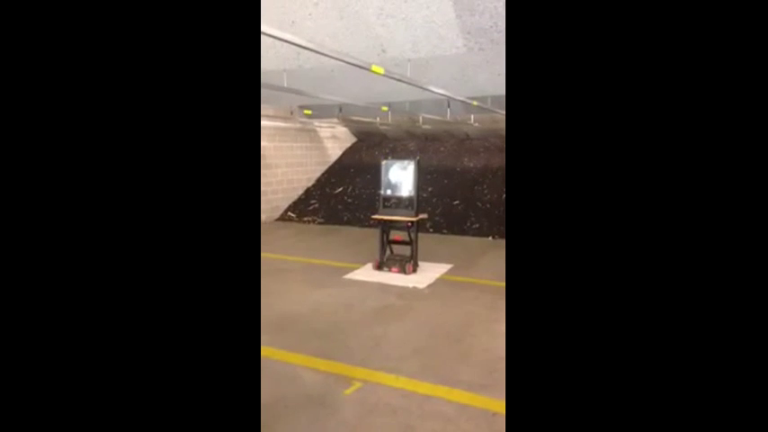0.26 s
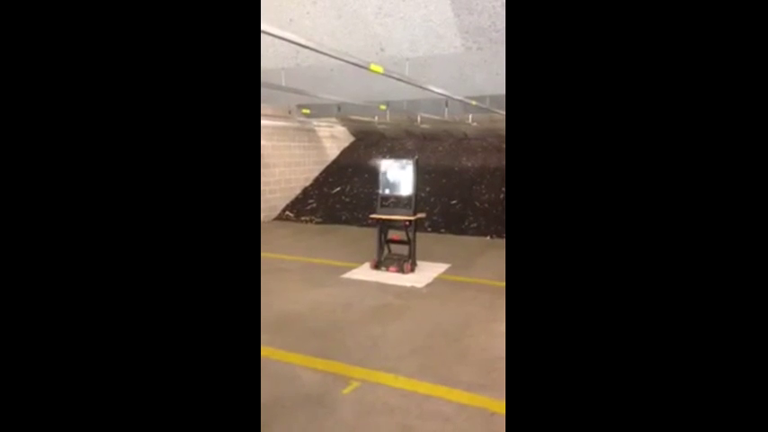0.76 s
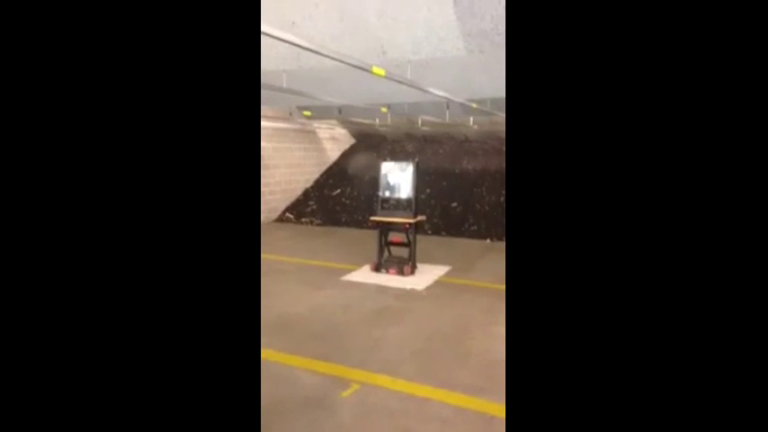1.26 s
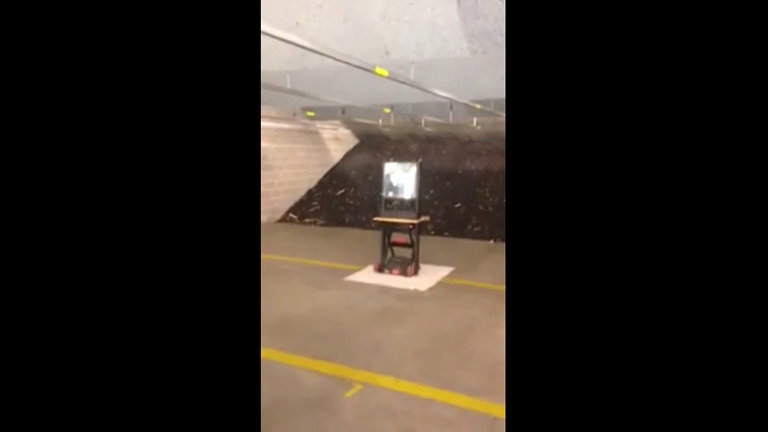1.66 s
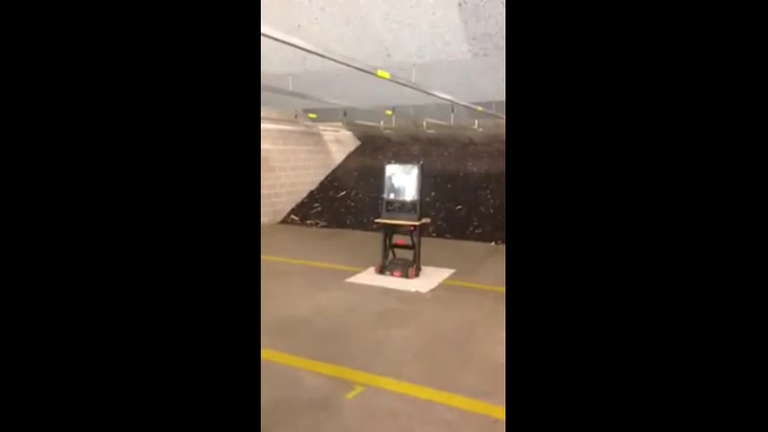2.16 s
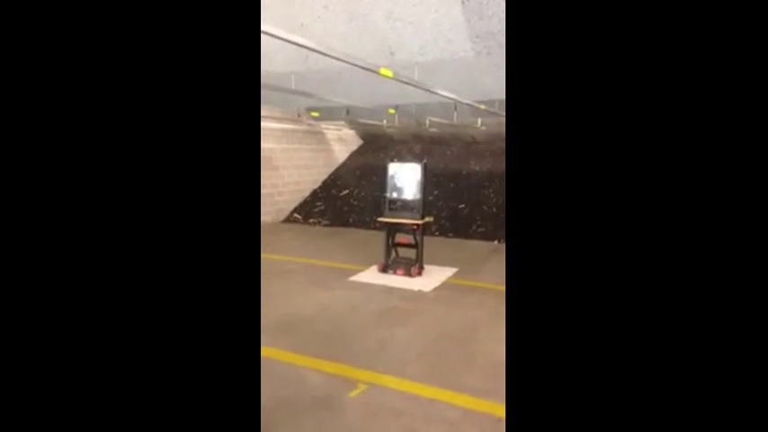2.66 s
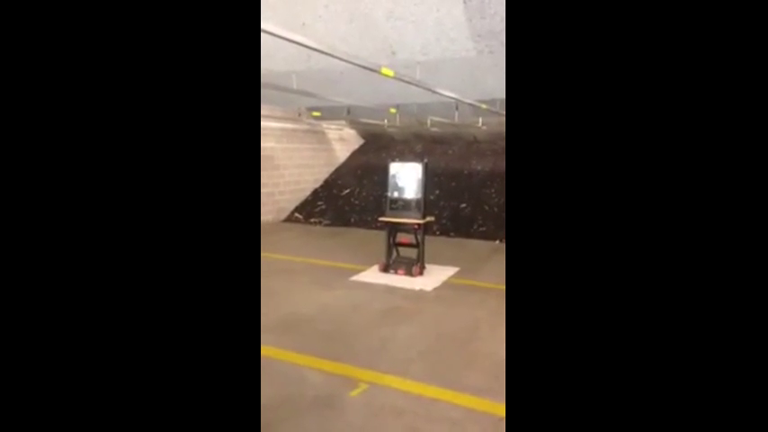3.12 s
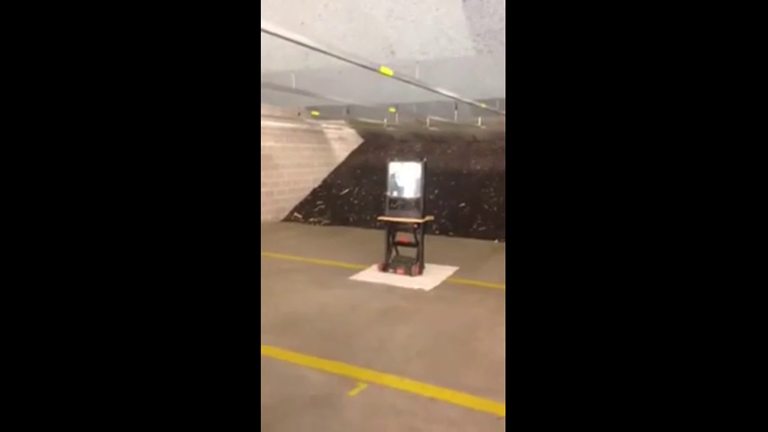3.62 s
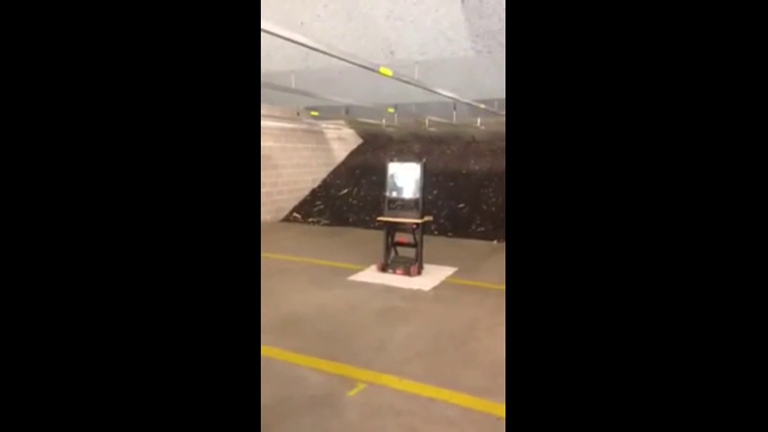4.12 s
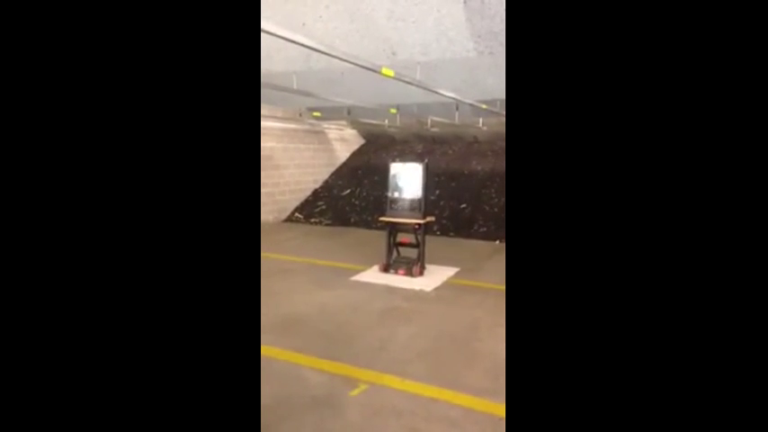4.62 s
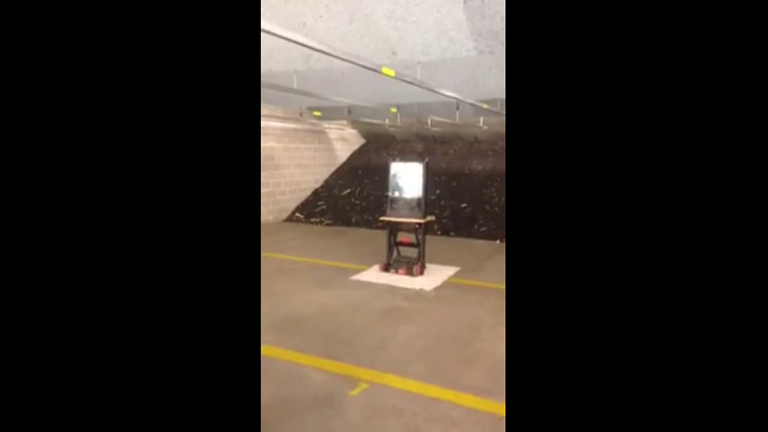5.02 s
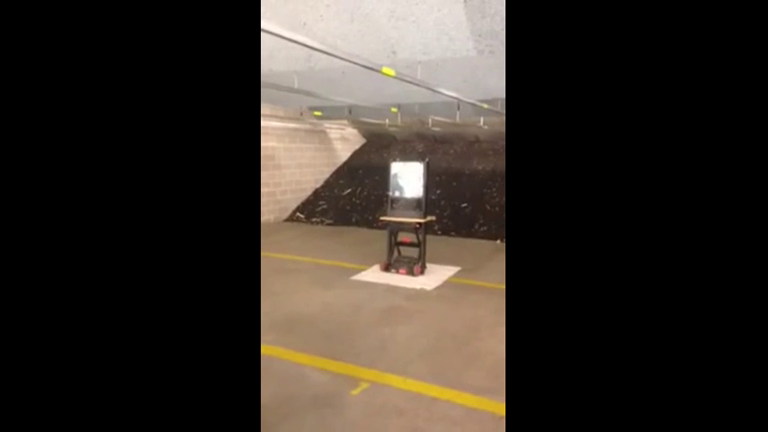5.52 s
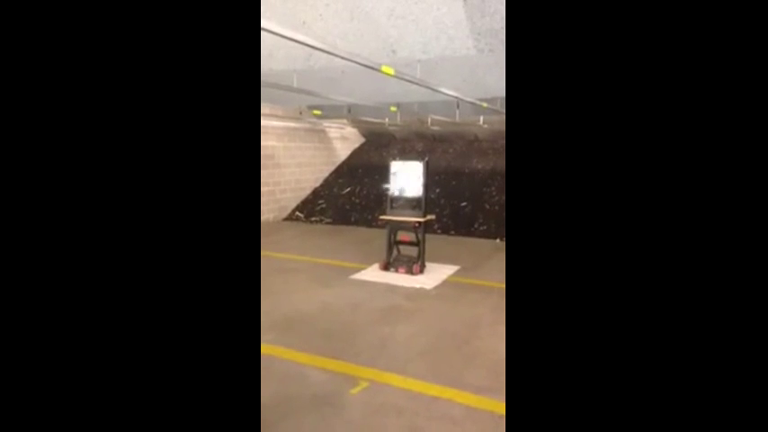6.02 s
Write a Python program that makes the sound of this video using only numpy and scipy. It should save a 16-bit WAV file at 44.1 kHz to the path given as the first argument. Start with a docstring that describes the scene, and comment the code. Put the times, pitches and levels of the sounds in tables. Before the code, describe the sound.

A bare concrete firing range, heard in mono by a phone near the firing line. A low, lumpy ventilation rush with a steady mains-like hum opens alone. At about 0.9 s, tiny ticks and a quick thin whistle swell into a hard, clipped gunshot; the hall fills with a noisy roar, a bass roll from the far end, and a fluttering echo repeating about twelve times a second, fading into a hollow mid-pitched ring. A brass case clicks and rings brightly around 1.7 s, with another click near 2.4 s. The second shot hits at 2.5 s, followed by case bounces from 3.0 to 3.3 s and small fading clinks until 4.3 s. The third shot comes at 4.5 s, with a sharp metallic click at 5.3 s and a duller one near 6.0 s. The fourth, slightly weaker blast lands at 6.15 s, its echo cut off by the ending.

```python
"""Four shots in a concrete firing range

A long concrete hall, heard by a phone near the firing line: shaped noise and tones make the ventilation's hum.
Faint ticks and a whistle lead into each noise-burst blast; scattered noise and slow modes fill the hall, and a
flutter echo between the side walls, a feedback loop, outlasts the rest. Brass cases click and ring on the floor
as damped modes. The input lifts quiet moments, and the blasts overload the microphone."""
import sys
import numpy as np
from scipy import signal
from scipy.fft import rfft, irfft, next_fast_len
from scipy.io import wavfile
from scipy.ndimage import uniform_filter1d, map_coordinates

SR = 44100
rng = np.random.default_rng(int(sys.argv[2]) if len(sys.argv) > 2 else 0)


def pcm_store(signal):
    """Save signal as 16-bit PCM."""
    levels = np.round(np.clip(np.atleast_2d(signal), -1, 1) * 32767)
    wavfile.write(sys.argv[1], SR, levels.astype(np.int16).T)


N = 276948


def amp(db):
    """Amplitude factor of a level in dB."""
    return 10 ** (np.asarray(db) / 20)


def unit(x):
    """Scale to an rms of 1."""
    return x / np.sqrt(np.mean(x ** 2) + 1e-20)


def along(table, hz):
    """Every column after the frequency, read on a log axis."""
    f, *cols = np.transpose(table)
    return [np.interp(np.log(hz + 1), np.log(f + 1), c) for c in cols]


def passed(x, order, hz, kind="low"):
    """Butterworth filter with its corner or corners in Hz."""
    return signal.sosfilt(signal.butter(order, hz, kind, fs=SR, output="sos"), x)


def filtered(x, response):
    """x times a complex response of frequency."""
    m = next_fast_len(len(x) + 3 * SR)
    spectrum = rfft(x, m) * response(np.fft.rfftfreq(m, 1 / SR))
    return irfft(spectrum, m)[:len(x)]


def causal(db):
    """Minimum-phase response with the given dB on the FFT grid."""
    cepstrum = irfft(db * np.log(10) / 20)
    half = len(cepstrum) // 2
    cepstrum[1:half] *= 2
    cepstrum[half + 1:] = 0
    return np.exp(rfft(cepstrum))


def add(track, s, sound):
    """Mix a sound in at s seconds."""
    part = track[round(s * SR):][:len(sound)]
    part += sound[:len(part)]


def burst(t60, length=.03):
    """Noise that starts at full strength and falls 60 dB in t60 seconds."""
    t = np.arange(round(length * SR)) / SR
    return rng.standard_normal(len(t)) * amp(-60 * t / t60)


def ring(modes, t, attack, scatter_db):
    """Damped modes, struck at new strengths each time."""
    total = np.zeros(len(t))
    for hz, db, t60 in modes:
        level = db + scatter_db * rng.standard_normal() - 60 * t / t60
        total += amp(level) * np.sin(2 * np.pi * hz * t)
    return total * (1 - np.exp(-t / attack))


def wobble(rate):
    """A smooth random curve, rate knots a second."""
    knots = rng.standard_normal(int(N * rate / SR) + 4)
    return map_coordinates(knots, [np.arange(N) * rate / SR])


def patchy(x, depth_db):
    """Random gain patches about 170 Hz wide and 70 ms long."""
    z = signal.stft(x, nperseg=512)[2]
    field = uniform_filter1d(rng.standard_normal(z.shape), size=2, axis=0)
    field = uniform_filter1d(field, size=12, axis=1)
    return signal.istft(z * amp(depth_db * unit(field)), nperseg=512)[1][:len(x)]


def ventilation():
    """A lumpy rush of air with unsteady fan and mains tones."""
    # Colour of the rushing air: (frequency [Hz], relative spectral level [dB])
    air_bands = [(20, -24), (55, -22.5), (85, -14), (105, -21.5), (170, -13.5), (240, -20.5), (340, -26),
                 (520, -30), (760, -37), (1100, -36.5), (2100, -44), (3800, -45), (6000, -48), (16000, -53)]
    # Fan and mains tones: (frequency [Hz], rms level before wobble [dB])
    hum_tones = [(119.6, -53.5), (177, -66.5), (1028, -78.5)]
    rush_db, ease_db_per_s = -55.5, 0.05  # the rush eases a little
    t = np.arange(N) / SR
    rush = unit(filtered(rng.standard_normal(N), lambda hz: amp(along(air_bands, hz)[0])))
    tones = np.zeros(N)
    for hz, db in hum_tones:
        level = np.sqrt(2) * amp(db + 1.1 * wobble(7.4))
        tones += level * np.sin(2 * np.pi * hz * t + 0.24 * wobble(11.0))
    return amp(rush_db - ease_db_per_s * t + 1.7 * wobble(15)) * rush + tones


def lead_in(out, s, whistle_db):
    """Faint ticks over a thin hiss, with a narrow whistle and low noise swelling just before the blast."""
    lead_s, tick_gap_s = .0232, .003
    tick_db, tick_loss_db, hiss_db = -21, 2, -46  # each tick is weaker than the last
    lead = np.arange(round(0.02 * SR)) / SR
    swell = amp(-22 * (2.0 - lead / lead[-1]))  # from -44 to -22 dB
    add(out, s - lead_s, amp(hiss_db) * rng.standard_normal(len(lead)))
    for k in range(4):
        tick = passed(burst(0.0045), 1, 5000)
        add(out, s - lead_s + k * tick_gap_s, amp(tick_db - k * tick_loss_db) * tick)
    whistle = unit(passed(rng.standard_normal(len(lead)), 2, [2650, 3150], "band"))
    add(out, s - .02, amp(whistle_db) * swell * whistle)
    low_noise = passed(rng.standard_normal(len(lead)), 2, 900)
    add(out, s - .02, amp(11.0) * swell * low_noise)


def near_blast():
    """The blast and its returns from near surfaces, each a crack of noise."""
    # Blast and near surfaces: (delay [s], level before the band filter and blast level [dB])
    reflections = [(0, 4.5), (.0015, 5.5), (.0045, 6.5), (.008, 4.5), (.0225, 6.5), (.026, 3.5),
                   (.042, 4.5), (.059, 1.5)]
    near = np.zeros(SR // 5)
    for late, level in reflections:
        add(near, late, amp(level) * burst(0.0094))
    return passed(near, 1, [2500, 9000], "band")


def diffuse():
    """Scattered sound in the hall: every frequency builds up and dies at its own speed."""
    # The diffuse hall: (frequency [Hz], relative spectral level [dB], build-up [s], t60 [s])
    hall_bands = [(30, -61.5, .005, .4), (105.8, -37.5, .02, 0.81), (144, -3, 0.12, 1.6),
                  (200, 2, 0.088, 1.5), (290, 0, 0.19, 1.45), (427, 2.5, 0.056, 0.75),
                  (795, -3.5, 0.0017, 0.96), (1610, -8.5, 0.02, 1.33), (2130, -7.5, 0.058, 1.31),
                  (4040, -9.5, 0.011, 1.013), (6100, -13.5, 0.043, 0.97), (9260, -19.5, .02, 0.83),
                  (15000, -26.5, 0.052, 0.46)]
    # Hall sound still missing at the blast: (frequency [Hz], share [0-1])
    held_back = [(250, 0.81), (500, 0.47)]
    hz, t, z = signal.stft(rng.standard_normal(2 * SR), SR, nperseg=512, noverlap=448)
    db, rise, t60 = (c[:, None] for c in along(hall_bands, hz))
    missing = np.clip(along(held_back, hz)[0], 0, 1)[:, None]
    z = z * amp(db - 60 * t / t60) * (1 - missing * np.exp(-(t / rise) ** 2))
    tail = signal.istft(z, SR, nperseg=512, noverlap=448)[1]
    return amp(12.5) * passed(patchy(tail, depth_db=1.5), 6, 138, "high")


def flutter():
    """The same few arrivals return every round trip, each time weaker and more blurred by the walls."""
    # Arrivals in each round trip: (delay [s], relative level [dB])
    arrivals = [(.0008, 0.5), (.013, -3.5), (.0262, 1), (.0446, -0.5), (.0575, -12), (.0702, 0.5)]
    # The flutter echo: (frequency [Hz], relative spectral level [dB], t60 [s])
    flutter_bands = [(250, -40.5, 1.5), (390, -7.5, 1.3), (531, 3.5, 1.7), (734, 5, 2.04), (850, 7, 1.73),
                     (1082, 3, 1.95), (1395, -19, 2.31), (2150, -11.5, 2.37), (2800, -22.5, 2.85),
                     (4300, -22, 2.17), (6340, -24.5, 1.76), (9000, -41.5, 1)]
    round_trip = .084  # s from wall to wall and back
    rough_wall, rough_hz = .008, 60  # phase scatter per trip [rad per kHz], new every so many Hz
    gather_s = 0.21  # the echo gathers out of the scattered sound
    trip = np.zeros(2 * SR)
    for s, db in arrivals:
        scatter = burst(0.047, length=.04)  # rough blockwork smears every arrival
        add(trip, s, amp(db) * np.ones(1))
        add(trip, s, amp(db - 1.5) * scatter / np.linalg.norm(scatter))
    bumps = rng.standard_normal(SR // 20)

    def walls(hz):
        """Endless round trips summed as a feedback loop."""
        db, t60 = along(flutter_bands, hz)
        blur = rough_wall * hz / 1000 * map_coordinates(bumps, [hz / rough_hz])
        delay = np.exp(-2j * np.pi * hz * round_trip + 1j * blur)
        again = amp(-60 * round_trip / t60) * delay
        return causal(db) * again / (1 - again)

    gather = 1 - np.exp(-(np.arange(2 * SR) / SR / gather_s) ** 2)
    return amp(29.5) * gather * patchy(filtered(trip, walls), depth_db=4.0)


def slow_modes(t):
    """The slowest hall modes ring on with an uneven, patchy decay."""
    # Slowest hall modes: (frequency [Hz], mean level under the blast level [dB], t60 [s])
    linger_modes = [(608, -31, 4.2), (647, -32.5, 4.9), (693, -28, 3.5), (740, -34, 1.3), (783, -29.5, 3.6),
                    (823, -31.5, 2.3)]
    return patchy(ring(linger_modes, t, attack=0.08, scatter_db=0.5), depth_db=1.0)


def standing_waves(t):
    """Standing waves across the hall swell slowly and die away."""
    # Standing waves: (frequency [Hz], mean level before the slow attack [dB], t60 [s])
    boom_modes = [(202.5, -19.5, 1.7), (274.3, -12.5, 2.1), (297.8, -12.5, 2.1)]
    return ring(boom_modes, t, attack=0.36, scatter_db=1.7)


def far_roll():
    """The bass returns in one roll from the far end of the hall."""
    far = passed(burst(.35, length=.3), 4, [152, 305], "band")
    return far / np.abs(far).max()


def shots():
    """Ticks and a swelling whistle lead into each blast; the hall answers."""
    # Shots: (time [s], blast level [dB], whistle level before its swell [dB])
    shot_list = [(0.9188, -9, 5.5), (2.475, -8.5, -4.5), (4.4876, -8, -10), (6.146, -10.5, -16)]
    boom_late, far_s, far_db = .034, .115, -4  # delays [s], roll level against the blast [dB]
    out, t = np.zeros(N), np.arange(2 * SR) / SR
    for s, db, whistle_db in shot_list:
        lead_in(out, s, whistle_db)
        # the pressure wave pushes the diaphragm
        add(out, s - .004, amp(db - 19.5) * np.hanning(round(0.01 * SR)))
        add(out, s, amp(db) * near_blast())
        add(out, s, amp(db) * (diffuse()[:2 * SR] + flutter()))
        add(out, s, amp(db) * slow_modes(t))
        add(out, s + boom_late, amp(db) * standing_waves(t))
        add(out, s + far_s, amp(db + far_db) * far_roll())
    return out


def cases():
    """Each contact clicks, chatters and rings the brass tube; floor and walls add a short, duller wash."""
    # Brass on concrete: (time [s], click level before filters [dB], click pitch [Hz],
    #                     high ring level before mode levels and tumble [dB])
    contacts = [(1.675, -32, 11000, -71), (1.6947, -27, 6000, -72), (1.7064, -33, 5000, -70),
                (1.718, -19.5, 6000, -38), (2.3867, -22.5, 5000, -73.5), (2.415, -32, 8000, -75),
                (3.042, -30, 13000, -78), (3.214, -27, 9000, -66), (3.237, -33, 6000, -70),
                (3.2628, -19, 4800, -44.5), (3.582, -37, 9000, -58.5), (3.698, -45, 5200, -73),
                (3.763, -51, 5300, -80), (3.856, -33.5, 6070, -62), (3.9998, -39, 6000, -71),
                (4.1, -46, 5000, -54.5), (4.196, -51.5, 5020, -61), (4.255, -56, 5000, -62.5),
                (5.3263, -14.5, 7500, -52), (5.359, -29, 5540, -58), (5.9775, -18.5, 4000, -62)]
    # Modes of the brass tube: (frequency [Hz], relative level [dB], t60 [s])
    brass_modes = [(4900, -4, .03), (5180, -4.5, 0.035), (5300, 0.5, .04), (5480, 0.5, .04),
                   (5560, -7, .03), (11150, -7, .2), (11170, -6.5, .22), (11300, -11, .35),
                   (11400, -2, 0.42), (11440, -6, .33), (11490, -8, .29), (11500, -6.5, .25)]
    # Colour of the clicks: (frequency [Hz], gain [dB])
    click_colour = [(600, -27.5), (1500, -2), (3500, 2), (7500, 1.5), (12000, -7.5), (16000, -19)]
    chatter_s, chatter_db = 0.034, -21  # two small after-knocks: mean delay, level under the contact
    rattle_db, high_hz = -34, 8000  # low modes follow the click; high ones depend on how the case lands
    tumble_rate, tumble_db = 70, 3.5  # the spinning case makes its ring flicker: knots per s, depth
    clicks, rings, t = np.zeros(N), np.zeros(N), np.arange(SR // 2) / SR
    low = [m for m in brass_modes if m[0] < high_hz]
    high = [m for m in brass_modes if m[0] > high_hz]
    for s, db, hz, ring_db in contacts:
        band = [hz / 2, min(hz * 2, .95 * SR / 2)]
        late = np.append(0, rng.uniform(.3, 1.7, size=2) * chatter_s)
        for after, level in zip(late, [db, db + chatter_db, db + chatter_db]):
            add(clicks, s + after, amp(level) * passed(burst(0.0045), 1, band, "band"))
        add(rings, s, amp(ring_db) * ring(high, t, attack=.003, scatter_db=0.5))
        add(rings, s, amp(db + rattle_db) * ring(low, t, attack=.002, scatter_db=3))
    clicks = filtered(clicks, lambda hz: causal(along(click_colour, hz)[0]))
    rings = rings * amp(tumble_db * wobble(tumble_rate))
    wash = passed(burst(0.12, length=.4), 1, 6000)
    wash /= np.linalg.norm(wash)
    reflected = signal.fftconvolve(amp(-9) * clicks + amp(-4.5) * rings, wash)[:N]
    return clicks + rings + reflected


def lifted(x):
    """The gain control turns up when the recent level is low."""
    quiet_db, knee_db, follow_s = -41.5, 8, 0.21  # centre and softness of the turn-up, averaging time
    most_db = 3.75  # lift approached in silence
    keep = np.exp(-1 / (follow_s * SR))
    start = [keep * np.mean(x[:SR // 4] ** 2)]
    power = signal.lfilter([1 - keep], [1, -keep], x ** 2, zi=start)[0]
    over = (10 * np.log10(power + 1e-12) - quiet_db) / knee_db
    return x * amp(most_db / (1 + np.exp(over) / 2))


def scene():
    """Ventilation, shots and falling cases together, in mono."""
    return (ventilation() + shots() + cases())[None]


def record(dry):
    """The input lifts quiet moments, rounds off peaks, thins the deep bass and limits the band."""
    top_hz = 15050  # the treble slopes off from here and ends at 16400 Hz
    loud = lifted(dry[0])
    soft = loud / (1 + np.abs(loud / 1.05) ** 4) ** (1 / 4)
    thin = passed(soft, 1, 60, "high")
    return filtered(thin, lambda hz: amp(-np.clip(hz - top_hz, 0, None) * .035) * (hz < 16400))[None]


dry = scene()
out = record(dry)
pcm_store(out)
```